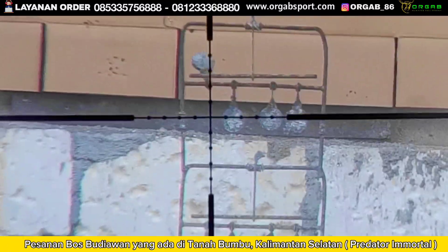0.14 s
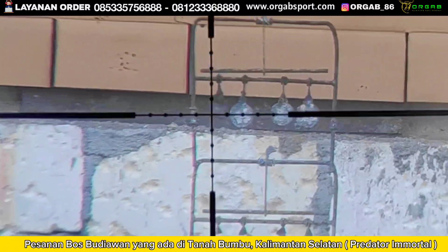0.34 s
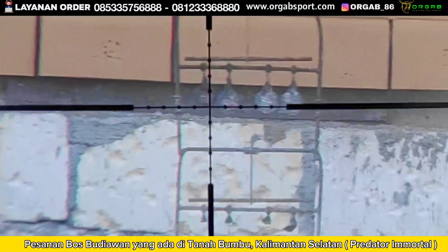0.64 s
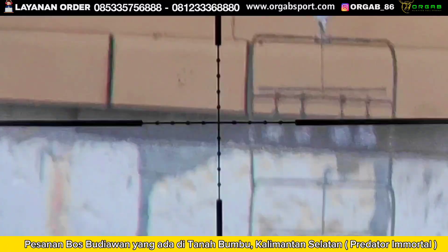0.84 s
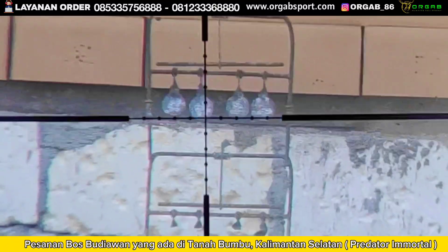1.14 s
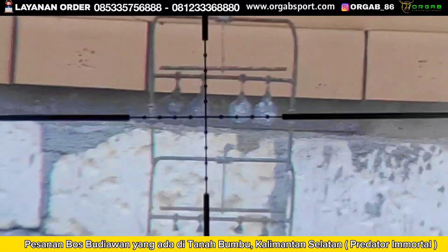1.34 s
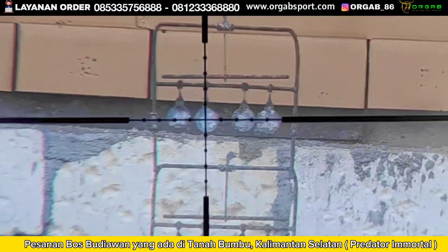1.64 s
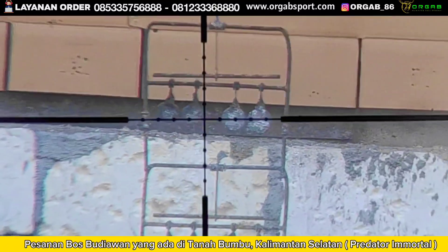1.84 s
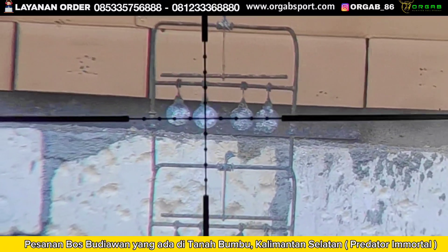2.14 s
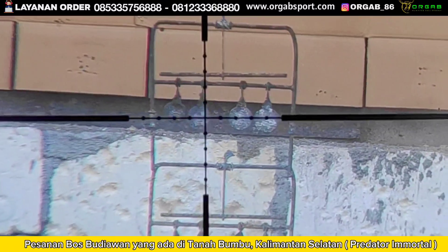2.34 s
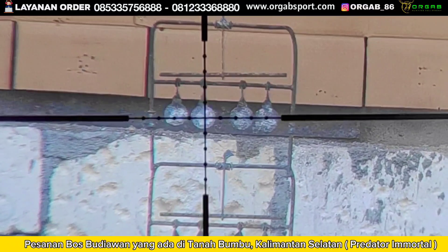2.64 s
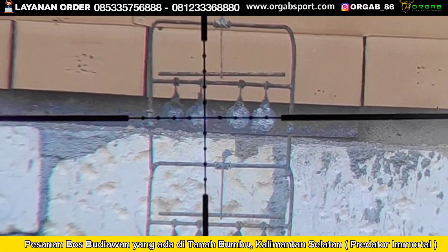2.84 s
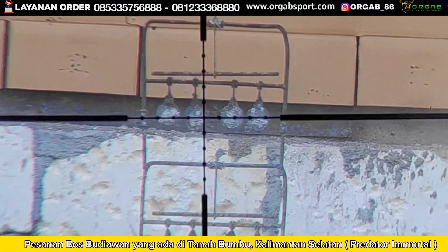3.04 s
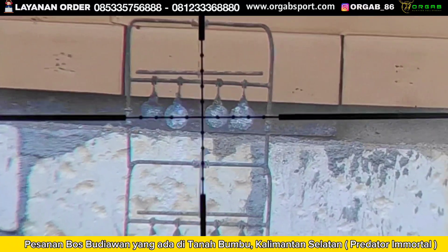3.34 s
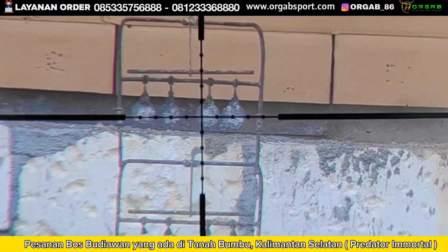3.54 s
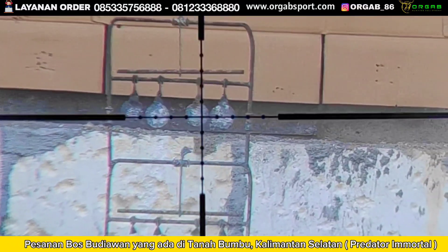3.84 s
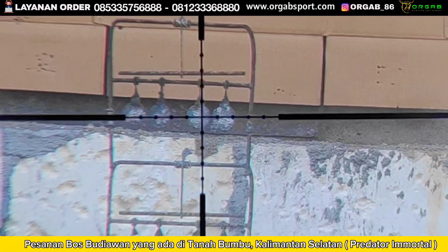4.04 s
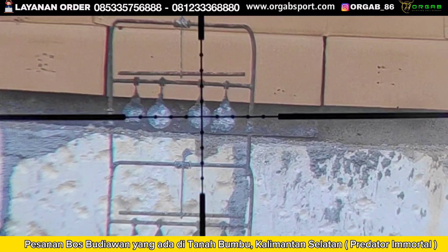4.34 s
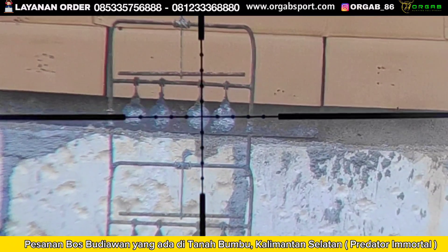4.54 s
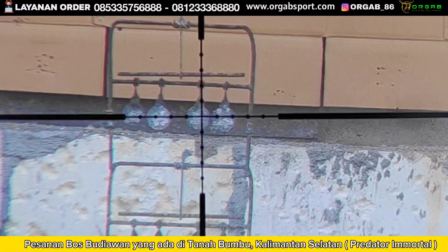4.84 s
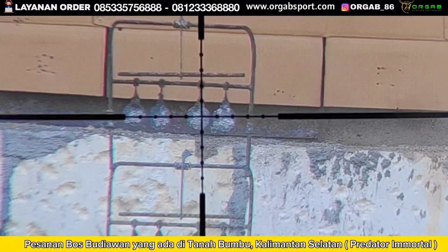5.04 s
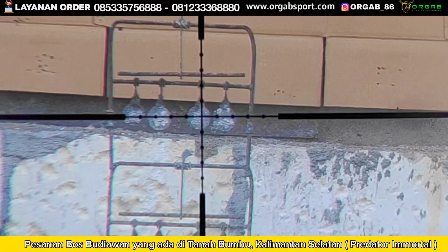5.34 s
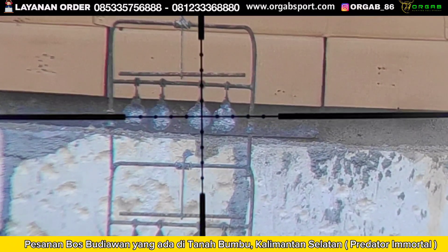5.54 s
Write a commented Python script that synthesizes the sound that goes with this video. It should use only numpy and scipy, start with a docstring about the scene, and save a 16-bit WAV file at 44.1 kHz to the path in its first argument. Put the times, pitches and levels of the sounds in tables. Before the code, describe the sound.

A suppressed air rifle cracks, its pellet hits steel, and the bolt clacks through a reload while a small machine chugs nearby.

```python
"""A walled yard, heard from a two-port microphone on the scope of a suppressed air rifle.
The report dies away between the walls, the barrel rings and the pellet hits a steel spinner.
The action is cycled: a spring pings, steel slides, and hard clacks make the limiter duck.
A small piston machine hums nearby and chugs about seven strokes a second, each a valve puff
and a casing knock, while hands settle on the stock."""
import sys
import numpy as np
from scipy import signal
from scipy.fft import rfft, irfft, next_fast_len
from scipy.io import wavfile
from scipy.ndimage import uniform_filter1d, minimum_filter1d, map_coordinates

SR = 44100
rng = np.random.default_rng(int(sys.argv[2]) if len(sys.argv) > 2 else 0)


def wav_out(sig):
    """Save sig, one row per channel (or a flat mono array), as 16-bit PCM at SR to the path in sys.argv[1]."""
    wavfile.write(sys.argv[1], SR, np.round(np.clip(np.atleast_2d(sig).T, -1, 1) * 32767).astype(np.int16))


N = 250929
T = np.arange(N) / SR
PORT_LAG_SAMPLES = 18
EDGE_RISE_S = 0.00008

# left-right likeness: freq_hz, correlation
PORT_LIKENESS = [(60, 0.99), (250, 1), (500, 1), (1000, 0.47), (2400, 0.28), (5000, 0.015), (14000, 0.064)]
# port balance: freq_hz, left_minus_right_db
PORT_BALANCE = [(100, 0.5), (280, -0.5), (450, -1), (1400, -0.5), (2300, -4), (4000, 1.5), (5200, -6),
                (6200, -1), (8500, -2), (10500, 9), (14000, 10.5)]
# right port, turned from the action: freq_hz, gain_db
FAR_PORT_EQ = [(200, 9), (900, -1.5), (2500, -4.5), (6000, -5.5), (9000, -10.5), (14000, -27)]
# wall echo decay: freq_hz, t60_s
WALL_DECAY = [(200, .4), (1000, 0.38), (4000, 0.46), (8000, 0.34), (14000, 0.29)]
# wall echo colour: freq_hz, gain_db
WALL_EQ = [(200, -18), (1200, -3.5), (3000, 4.5), (7500, 0.5), (11000, -1.5), (14000, -2.5)]

# report, its left-port colour, its far-wall return: freq_hz, gain_db
REPORT_EQ = [(88, -35.5), (150, -16), (228, 2.5), (293, -18), (734, -11), (1020, -14.5), (1430, -16),
             (1580, -15), (1740, -9), (4690, -3), (7860, 0), (14500, -13.5)]
REPORT_LEFT_EQ = [(200, -1.5), (1000, 6.5), (2400, 1.5), (5000, -1.5), (7500, -3), (11000, -0.5)]
FAR_WALL_EQ = [(300, -25), (1300, -9.5), (2600, -10), (5000, -6), (7500, 4), (10000, 1), (14000, -11)]
# far-wall return: peak_s, level_db, rise_s, fall_s
FAR_WALL_SWELL = [(0.16, -18, 0.06, 0.032)]
# barrel ring: pitch_hz, gain_db, base_t60_s
BARREL_MODES = [(725, -1, 0.63), (2850, -5, 0.73), (4120, -2, 0.61), (4760, -16, 0.35), (5430, 0, 0.21),
                (5800, -5, 0.32), (6650, -7, 0.7), (6400, -12, .42), (6900, -11.5, 0.74), (7770, -5, 0.27),
                (7620, 7, 0.19), (8100, -11, 0.45), (9600, 1, .38), (10100, -3, 0.37), (12270, 5, .4)]

# yard rumble, broad hiss: freq_hz, gain_db
YARD_EQ = [(12, -24), (20, 3), (82, 0.5), (214, -12), (274, -12.5), (361, -16.5), (610, -15.5),
           (974, -12.5), (1120, -14), (2110, -18), (3100, -23.5), (5090, -23), (6000, -22.5),
           (12600, -34.5), (14500, -42)]
FIZZ_EQ = [(500, 5), (2500, 10.5), (5000, 11.5), (10000, 7.5), (14000, 2)]
# machine hum: pitch_hz, level_db
HUM_PARTIALS = [(26.9, -41), (147, -56.5), (274.5, -56.5), (495.3, -59), (791.3, -65), (1010, -48),
                (1399, -50), (2347, -57)]
# machine frame: pitch_hz, width_hz, gain_db
FRAME_MODES = [(184, 36, -2), (465, 94, -4), (788, 48, 4), (991, 40, 9), (1399, 23, 9), (1720, 61, -32),
               (2130, 310, -4.5)]
# machine frame drone and whine: time_s, level_db
FRAME_LEVELS = [(1.5, -65), (1.9, -48), (2.23, -42.5), (4.03, -36.5), (4.67, -40), (5.02, -37.5),
                (5.09, -40), (5.69, -39.5)]
WHINE_LEVELS = [(1.5, -59), (2.05, -53.5), (2.5, -45), (3.1, -49.5), (5.6, -48)]

# action hitting its stops:
# peak_s, level_db, rise_s, stock_db, tube_db, clink_hz, clink_db, edge_db, echo_db, far_port_db
BOLT_CLACKS = [(0.591, -19.5, 0.0003, -20, -3, 8600, -15, -6, -12, -14),
               (0.596, 5.5, 0.00102, -23, -7, 12100, -17, -1, -15, -11.5),
               (0.6034, -6, 0.00056, 0.5, 2, 4860, -19, 3, -5, 2),
               (0.7411, 4, 0.0016, -6, -12, 4300, -10, -5, -4.5, 0),
               (0.772, -14, 0.0011, -24, -22, 9000, -10, -4, -8, -6),
               (0.8314, -13, 0.0004, -14, -22, 10370, 12, -8, 8, -2),
               (0.8365, 1.5, 0.0015, -2, -9, 2777, -8.5, 7, -5, -4),
               (0.845, -14, 0.0012, -15, -18, 6400, -10, -2, -8, -3),
               (0.8679, 3, 0.0024, 8.5, -2, 6660, -2, 4, -8.5, -4),
               (0.976, 2.5, 0.001465, -5, -4, 5460, -10, 6, -6.5, -10.5),
               (1.012, -10, 0.0012, -19, -10, 13200, -12, -2, 1, 0),
               (1.052, -5.5, 0.00053, -15, -14, 7840, 2, -11, -6, -4),
               (1.069, -14, 0.00066, -5.5, -7, 10800, -10, -3, -2, 0),
               (1.1, -6, 0.0017, -4, 0, 4870, -11, -12, -19, -8),
               (1.1144, -22, 0.00044, -16, -25, 7600, -10, -2, -10, -9),
               (1.1278, -2.5, 0.00027, -12, -16, 12650, -10, -7, -13, -20),
               (1.136, -8.5, 0.0022, -4, 1.5, 7600, -5, -7, -7, 1.5),
               (1.211, -20.5, 0.0012, -2.5, -6, 4350, 5, -6, 2, 5),
               (1.2923, 7, 0.00027, 3, 0, 4040, -8, -2, 2, 5)]
# pellet on the spinner: same columns without peak_s
PELLET_CONTACT = [(6, 0.00012, -13, -2, 4000, -4, 6, 7.5, 4)]
# impact crack, steel-on-steel edge, pellet's dull blow: freq_hz, gain_db
CRACK_EQ = [(100, -19), (500, -19), (1300, -9), (2500, -2.5), (6000, 1.5), (10000, 7.5), (14000, -2)]
EDGE_EQ = [(4000, -22.5), (8500, -6), (10500, 7), (14000, -7)]
PELLET_THUMP_EQ = [(70, 7), (200, -6), (500, 5), (1200, -7), (2000, -5), (4200, -4), (7000, -22)]
# action body, bolt lock: pitch_hz, width_hz, gain_db
ACTION_MODES = [(780, 47, -11), (2604, 61, -2.5), (4390, 270, -3), (6700, 560, -5), (10650, 1660, -2),
                (13340, 1170, 1)]
LOCK_MODES = [(2780, 64, -1.5), (4080, 520, 3.5), (5800, 55, 3.5), (8800, 1300, 0.5), (10200, 540, 5.5)]
# small clamped steel parts: pitch_hz, gain_db
PART_MODES = [(2190, -6), (2770, -5), (4230, -2), (5770, -11), (6460, 5), (8090, -11), (9500, -4),
              (10300, 1), (12050, -4), (12960, 0)]
# stock, hollow air tube, hammer spring: pitch_hz, gain_db, t60_s
STOCK_MODES = [(190, -2, 0.023), (283, -9, 0.093)]
TUBE_MODES = [(832, 1.5, 0.05), (860, 4.5, 0.046), (1730, -14, 0.0092)]
SPRING_MODES = [(10500, -11, .12), (10800, 2.5, 0.16), (11270, 0, .12), (12800, 7, 0.13), (13400, 0, 0.14),
                (13200, -4, 0.15)]

# hands brushing the stock: time_s, fall_s, hiss_db, rub_db
HAND_BRUSHES = [(0.38, 0.011, -32, -38), (1.99, 0.0025, -29, -52), (2.2, 0.033, -31, -29),
                (3.363, 0.061, -31, -52), (3.471, 0.042, -30.5, -29.5), (3.79, 0.072, -40, -52),
                (3.87, 0.027, -56, -24.5)]
# sleeve sliding: peak_s, level_db
SLEEVE_SWISHES = [(3.03, -42.5), (4.77, -37.5)]
# sleeve colour: freq_hz, gain_db
SLEEVE_EQ = [(2000, -13), (4300, 5), (6500, -0.5), (9000, -5), (14000, -24)]
# dull knocks on the stock: start_s, level_db, pitch_hz
STOCK_KNOCKS = [(0.381, -27, 400), (0.405, -31.5, 344), (0.874, -22.5, 299), (2.126, -30, 496),
                (3.479, -20, 760)]
# hammer spring slipping: start_s, strength_db
SLIPS = [(0.47, -3), (0.4752, -7.5), (.481, -8), (0.489, -11), (.66, -13.5), (0.689, -16)]
# bolt travel: peak_s, rasp_db, hiss_db, rise_s, fall_s
BOLT_SLIDES = [(0.591, -22, -27, 0.0043, 0.01), (0.729, -18.5, -19.5, 0.022, 0.02),
               (0.812, -34, -29.5, 0.069, 0.019), (0.95, -39, -21.5, 0.079, 0.021),
               (1.039, -35, -20, 0.043, 0.047), (1.1, -23, -17.5, 0.0081, 0.035),
               (1.2, -28, -25.5, 0.019, 0.019)]
# sliding steel: freq_hz, gain_db
RASP_EQ = [(100, -5.5), (400, -20), (850, 2.5), (1150, -7), (1600, 6), (2500, 7.5), (3300, 1.5),
           (4500, 3.5), (9000, -44)]
STEEL_HISS_EQ = [(500, -19.5), (3300, -14), (5000, -3), (8000, -1), (11000, 0), (13500, -2.5)]

# piston strokes: knock_s, puff_db, knock_db, cover_db
PISTON_STROKES = [(1.506, -43, -25.5, -44), (1.655, -33.5, -33, -40), (1.802, -40, -22, -32),
                  (1.952, -34.5, -33.5, -31), (2.098, -37, -23, -30), (2.244, -25.5, -31, -41),
                  (2.391, -30.5, -19.5, -27.5), (2.535, -35.5, -39, -45), (2.678, -30.5, -26.5, -31.5),
                  (2.822, -32, -29, -39), (2.965, -26.5, -30.5, -24), (3.106, -31, -32, -34),
                  (3.254, -28.5, -20, -28), (3.401, -33, -22.5, -19.5), (3.546, -26, -22.5, -21),
                  (3.697, -26, -38, -32), (3.839, -28, -31, -28), (3.982, -24.5, -30, -27),
                  (4.124, -25, -26.5, -22), (4.265, -25, -27, -27), (4.407, -25, -32, -36),
                  (4.557, -25, -22, -23), (4.705, -29.5, -41, -32), (4.861, -27.5, -21.5, -14),
                  (5.012, -25.5, -29, -21.5), (5.162, -27.5, -19.5, -22.5), (5.31, -22.5, -42, -26.5),
                  (5.459, -25.5, -21.5, -23), (5.608, -23.5, -26.5, -20.5)]
# valve puff (also hand rub), share of a knock reaching the walls: freq_hz, gain_db
PUFF_EQ = [(600, -28), (1250, 3), (1600, 8.5), (2000, 7), (2450, 0.5), (2900, -13.5), (6000, -24)]
KNOCK_SEND_EQ = [(2300, -4), (3100, -20), (4000, -12), (5000, -9), (8000, -2.5)]
# valve chamber, casing: pitch_hz, width_hz, gain_db
VALVE_MODES = [(1440, 220, -7.5), (1724, 280, 1.5), (1940, 660, -0.5), (2090, 174, 1.5), (2467, 102, 2),
               (4930, 1800, 0.5)]
CASING_MODES = [(2240, 110, -7.5), (3520, 53, 6.5), (4990, 54, -6), (5330, 93, 1), (5440, 100, -14),
                (6650, 130, -16), (7900, 140, -10.5), (9740, 300, -11), (12200, 470, -15)]
# clean pings of thin cover and casing: pitch_hz, gain_db
COVER_PINGS = [(2310, 1.5), (2480, -14.5)]
CASING_PINGS = [(3520, -15.5), (5000, -7), (5380, -23)]
# faint squeaks: peak_s, level_db
THIN_SQUEAKS = [(3.66, -49), (3.71, -43), (3.775, -39.5), (4.46, -43), (4.74, -45), (4.82, -49)]


def amp(db):
    """Decibels to gain."""
    return 10 ** (np.asarray(db) / 20)


def along(points, hz):
    """Interpolate (freq_hz, value) points on a log axis."""
    freqs_hz, values = np.transpose(points)
    return np.interp(np.log(hz + 1), np.log(freqs_hz + 1), values)


def curve(rows):
    """(time_s, value) rows as one value per sample."""
    return np.interp(T, *np.transpose(rows))


def wobble(rate_hz):
    """Smooth random curve, rate_hz knots a second."""
    coarse_s = T[::16]
    smooth = map_coordinates(rng.standard_normal(400), [coarse_s * rate_hz], mode="mirror")
    return np.interp(T, coarse_s, smooth)


def filtered(x, response):
    """Apply a complex frequency response."""
    size = next_fast_len(N + SR // 2)
    return irfft(rfft(x, size) * response(np.fft.rfftfreq(size, 1 / SR)), size)[..., :N]


def shape(points):
    """Response of a (freq_hz, gain_db) spectrum."""
    return lambda hz: amp(along(points, hz))


def body(modes):
    """Causal response of (pitch_hz, width_hz, gain_db) resonances, alternating in sign."""
    return lambda hz: sum((-1) ** k * amp(db) * 1j * hz * width / (pitch ** 2 - hz ** 2 + 1j * hz * width)
                          for k, (pitch, width, db) in enumerate(modes))


def excite(envelope, response):
    """Enveloped noise through a response; envelope 1 gives rms 1."""
    power = np.mean(np.abs(response(np.linspace(0, SR / 2, SR // 4))) ** 2)
    return filtered(envelope * rng.standard_normal(np.shape(envelope)), response) / np.sqrt(power)


def bursts(rows):
    """Envelope from (peak_s, level_db, rise_s, fall_s) rows."""
    out = np.zeros(N)
    for peak_s, db, rise_s, fall_s in rows:
        span = slice(max(0, int((peak_s - 10 * rise_s) * SR)), int((peak_s + 10 * fall_s) * SR))
        t = T[span] - peak_s
        out[span] += amp(db) * np.exp(-np.maximum(-t / rise_s, t / fall_s))
    return out


def rings(rows, attack_s):
    """Damped sines from (start_s, level_db, pitch_hz, t60_s) rows."""
    out = np.zeros(N)
    for start_s, db, hz, t60_s in rows:
        span = slice(max(0, int(start_s * SR)), int((start_s + 1.5 * t60_s) * SR))
        t = np.maximum(T[span] - start_s, 0)
        out[span] += amp(db - 60 * t / t60_s) * np.sin(2 * np.pi * hz * t) * (1 - np.exp(-t / attack_s))
    return out


def port_lag(hz):
    """Delay response of the right port."""
    return np.exp(-2j * np.pi * hz * PORT_LAG_SAMPLES / SR)


def from_yard(pair):
    """Yard sound reaches the left port first; each port has its own colour."""
    def response(hz):
        half_db = along(PORT_BALANCE, hz) / 2
        return np.array([amp(half_db), amp(-half_db) * port_lag(hz)])
    return filtered(pair, response)


def from_action(left, right):
    """The right port faces away from the action: later and duller."""
    return np.array([left, filtered(right, lambda hz: shape(FAR_PORT_EQ)(hz) * port_lag(hz))])


def spread(envelope, response):
    """Stereo noise, alike at both ports in the bass, less so in the treble."""
    def mid_side(hz):
        angle = np.arccos(np.clip(along(PORT_LIKENESS, hz), -1, 1)) / 2
        return np.array([np.cos(angle), np.sin(angle)])
    mid, side = filtered(excite(np.array([envelope, envelope]), response), mid_side)
    return np.array([mid + side, mid - side])


def walls(x):
    """Stereo yard echo; each frequency decays at its own rate."""
    hz, t, noise = signal.stft(rng.standard_normal((2, SR)), SR, nperseg=256)
    decay_db = along(WALL_EQ, hz)[:, None] - 60 * t / along(WALL_DECAY, hz)[:, None]
    tail = signal.istft(noise * amp(decay_db), SR, nperseg=256)[1]
    return signal.fftconvolve(x[None], tail / np.linalg.norm(tail[0]), axes=1)[:, :N]


def report(t60_s=1.0, barrel_sustain=1.7):
    """The shot hisses away between the walls and swells off the far one; the barrel rings."""
    decay = amp(-15 - 60 * T / t60_s + wobble(179.4))
    left, right = excite(np.array([decay, decay]), shape(REPORT_EQ))
    hiss = np.array([filtered(left, shape(REPORT_LEFT_EQ)), right])
    swell = excite(bursts(FAR_WALL_SWELL) * amp(wobble(142)) * amp([[0.5], [-0.5]]), shape(FAR_WALL_EQ))
    barrel = rings([(0, db - 27, hz, barrel_sustain * base_s) for hz, db, base_s in BARREL_MODES], 0.0008)
    return from_yard(hiss + swell + barrel * amp([[-7], [3]]))


def microphone_swing(drive=11, cross_s=0.345, settle_s=0.32):
    """The blast swings the left microphone to its limit, then more gently back, below hearing."""
    swing = drive * T * (T - cross_s) / settle_s ** 2 * np.exp(-(T / settle_s) ** 2)
    return np.array([np.tanh(swing), np.zeros(N)])


def yard_air():
    """Rumble and hiss of the yard; the treble comes and goes."""
    rumble = spread(amp(-35 + 0.71 * wobble(8.3)), shape(YARD_EQ))
    sheen = spread(amp(-52 + 3 * wobble(12)), shape(FIZZ_EQ))
    return rumble + sheen


def machine_drone():
    """Ringing frame, thin whine and a hum whose higher partials waver faster."""
    frame = spread(amp(curve(FRAME_LEVELS) + wobble(12)), body(FRAME_MODES))
    whine_db = curve(WHINE_LEVELS) + 3.5 * wobble(6.5)
    whine = spread(amp(whine_db), body([(4930, 210, -0.2), (5300, 240, -1.8)]))
    hum = sum(amp(db + 3 * wobble(3.43)) * np.sin(2 * np.pi * hz * T + 1.66 * wobble(np.sqrt(hz)))
              for hz, db in HUM_PARTIALS)
    return frame + whine + hum


def steel_contacts(rows, chatter_db=3, clink_t60_s=0.03):
    """Each impact cracks, rings steel parts, stock and air tube, and echoes off the walls."""
    peak_s, level_db, rise_s, stock_db, tube_db, clink_hz, clink_db, edge_db, echo_db, far_db = (
        np.transpose(rows))
    start_s = peak_s - rise_s
    fall_s = 0.0024 + 0.59 * rise_s  # slow to build, slow to die
    chatter = amp(chatter_db * wobble(1300))  # a run of tiny contacts
    hits = chatter * np.array([bursts(zip(peak_s, db, rise_s, fall_s))
                               for db in (level_db, level_db + far_db)])
    metal = amp(0.5) * excite(hits, shape(CRACK_EQ)) + amp(1) * excite(hits, body(ACTION_MODES))
    spikes = bursts([(s, db, EDGE_RISE_S, 0.00079) for s, db in zip(peak_s, level_db + edge_db)])
    edges = excite(spikes, shape(EDGE_EQ))
    clinks = rings([(s, db, hz, clink_t60_s)
                    for s, db, hz in zip(start_s, level_db + clink_db, clink_hz)], attack_s=0.0013)
    parts = rings([(s, db + mode_db + rng.normal(-24, 6.5), hz * rng.normal(1, 0.0295), clink_t60_s)
                   for s, db in zip(start_s, level_db) for hz, mode_db in PART_MODES], attack_s=0.00057)
    hollow = rings([(s, db + mode_db - 23, hz * rng.normal(1, 0.026), t60_s)
                    for levels, modes in ((stock_db, STOCK_MODES), (tube_db, TUBE_MODES))
                    for s, db in zip(start_s, levels) for hz, mode_db, t60_s in modes], attack_s=0.0022)
    direct = from_action(*(metal + edges + clinks + parts + hollow * amp([[-4], [3]])))
    root_energy = amp(level_db + echo_db) * np.sqrt(SR * (rise_s + fall_s) / 2)
    impulses = np.bincount((peak_s * SR).astype(int), root_energy, N)
    echo = walls(filtered(impulses, shape(CRACK_EQ))) * amp([[-10], [-12]])
    return direct + from_yard(echo)


def pellet_hit(hit_s=0.079):
    """The pellet meets the spinner: a crack over a dull blow."""
    thump = excite(bursts([(hit_s, -2, EDGE_RISE_S, 0.0019)]), shape(PELLET_THUMP_EQ))
    return steel_contacts([(hit_s, *PELLET_CONTACT[0])]) + from_action(thump, thump)


def hands(swish_s=0.079):
    """Skin and cloth brush the stock."""
    hiss = bursts([(s + 0.0013, db, 0.002, fall_s) for s, fall_s, db, _ in HAND_BRUSHES])
    rub = bursts([(s + 0.0046, db, 0.003, fall_s) for s, fall_s, _, db in HAND_BRUSHES])
    sleeve = bursts([(s, db, swish_s, swish_s) for s, db in SLEEVE_SWISHES])
    return sum(spread(envelope, shape(eq))
               for envelope, eq in ((hiss, FIZZ_EQ), (rub, PUFF_EQ), (sleeve, SLEEVE_EQ)))


def stock_knocks(t60_s=0.1):
    """Dull knocks on the stock, from handling and from the bolt hitting its stop."""
    return rings([(s, db, hz, t60_s) for s, db, hz in STOCK_KNOCKS], attack_s=0.00055)


def hammer_spring(buzz_depth=0.6, buzz_hz=260):
    """The spring scratches and pings as it slips, coils buzzing; clacks jolt it into a shimmer."""
    slips = bursts([(s, db, 0.001, 0.006) for s, db in SLIPS])
    scratch = amp(-9) * excite(slips, shape([(1000, -10), (8000, -11), (11000, 3), (14000, 0.5)]))
    plucks = [(s, db - 18.5) for s, db in SLIPS]
    jolts = [(s, db - 32) for s, db, *_ in BOLT_CLACKS]
    ping = rings([(s, db + mode_db + rng.normal(0, 2), hz + rng.normal(0, 78), t60_s)
                  for s, db in plucks + jolts for hz, mode_db, t60_s in SPRING_MODES], attack_s=0.00073)
    zing = ping * (1 + buzz_depth * wobble(buzz_hz)) + scratch
    return (zing + amp(-9) * walls(zing)) * amp([[0], [-14]])


def bolt_slides(catch_db=3.4):
    """Steel sticks and slips as the bolt travels: rasp and hiss."""
    peak_s, rasp_db, hiss_db, rise_s, fall_s = np.transpose(BOLT_SLIDES)
    catch = np.ones((2, 1)) * amp(catch_db * wobble(200))
    rasp = excite(catch * bursts(zip(peak_s, rasp_db, rise_s, fall_s)), shape(RASP_EQ))
    hiss = excite(catch * bursts(zip(peak_s, hiss_db, rise_s, fall_s)), shape(STEEL_HISS_EQ))
    return from_action(*(rasp + hiss))


def bolt_clacks():
    """The action hits its stops; the bolt snaps shut on the last clack."""
    shut_s = BOLT_CLACKS[-1][0]
    lock = excite(bursts([(shut_s, 15.5, EDGE_RISE_S, 0.0011)]), body(LOCK_MODES))
    return steel_contacts(BOLT_CLACKS) + from_action(lock, lock)


def rattle(count=5, from_s=1.08, to_s=1.2, fade_db_per_s=72):
    """Loose parts touch at uneven intervals, weaker as the bolt settles forward."""
    offsets_s = (to_s - from_s) * (np.arange(count) + rng.random(count)) / count
    clinks_hz = rng.uniform(4900, 11100, count)
    # columns as in BOLT_CLACKS
    return steel_contacts([(from_s + s, -25 - fade_db_per_s * s, 0.00066, -13, -9, hz, 0, -4, -9, 0)
                           for s, hz in zip(offsets_s, clinks_hz)])


def piston_strokes(puff_lead_s=0.0332, ping_t60_s=0.034, thump_hz=74, bump_hz=275, return_s=0.036):
    """Each stroke: valve puff, knock that pings cover and casing, thump, soft bump on the return."""
    knock_s, puff_db, knock_db, cover_db = np.transpose(PISTON_STROKES)
    hardness_db = knock_db + 19.5  # 0 for a hard knock
    thump_db = -14 + 0.44 * hardness_db
    tick_db = -28.5 + 1.6 * hardness_db  # soft knocks hardly tick
    grit = amp(0.64 * wobble(400))
    airflow = grit * bursts([(s - puff_lead_s, db, 0.0011, 0.01) for s, db in zip(knock_s, puff_db)])
    puffs = spread(airflow, lambda hz: shape(PUFF_EQ)(hz) * body(VALVE_MODES)(hz))
    blows = bursts([(s + 0.00058, db - 2, 0.0015, 0.0035) for s, db in zip(knock_s, knock_db)])
    knocks = spread(blows, body(CASING_MODES))
    spikes = bursts([(s + 0.0033, db, 0.0013, 0.003) for s, db in zip(knock_s, tick_db)])
    ticks = spread(spikes, shape(FIZZ_EQ))
    pings = rings([(s, db + mode_db + rng.normal(0, 2), hz * rng.normal(1, 0.018), ping_t60_s)
                   for levels, modes in ((cover_db, COVER_PINGS), (knock_db, CASING_PINGS))
                   for s, db in zip(knock_s, levels) for hz, mode_db in modes], attack_s=0.0016)
    thumps = rings([(s - 0.003, db, thump_hz, 0.09) for s, db in zip(knock_s, thump_db)], attack_s=0.011)
    bumps = rings([(s + return_s, rng.normal(-26, 2.2), bump_hz, 0.06) for s in knock_s], attack_s=0.0058)
    echo = walls(amp(4.5) * ticks[0] + amp(-5) * puffs[0] + filtered(knocks[0], shape(KNOCK_SEND_EQ)))
    return puffs + knocks + ticks + pings + thumps + bumps + echo


def squeaks(pitch_hz=9760, width_hz=59, swell_s=0.011):
    """Thin, high squeaks swell and fade."""
    envelope = bursts([(s, db, swell_s, swell_s) for s, db in THIN_SQUEAKS])
    return spread(envelope, body([(pitch_hz, width_hz, 0)]))


def scene():
    """The rifle at the microphone, the yard around it."""
    shot = report() + microphone_swing() + pellet_hit()
    action = hammer_spring() + bolt_slides() + bolt_clacks() + rattle()
    surroundings = yard_air() + machine_drone() + hands() + stock_knocks() + piston_strokes() + squeaks()
    return shot + action + from_yard(surroundings)


def record(dry, release_db_per_s=150, ceiling=0.99, cutoff_hz=14350):
    """Per-channel limiter, instant duck and steady recovery; then a steep low-pass."""
    over_db = 20 * np.log10(np.maximum(np.abs(dry) / ceiling, 1))
    release_db = release_db_per_s * T
    duck_db = np.maximum.accumulate(over_db + release_db, axis=1) - release_db
    gain = uniform_filter1d(minimum_filter1d(amp(-duck_db), size=21), size=21)
    return np.clip(filtered(dry * gain, lambda hz: 1 / np.sqrt(1 + (hz / cutoff_hz) ** 120)), -1, 1)


dry = scene()
out = record(dry)
wav_out(out)
```